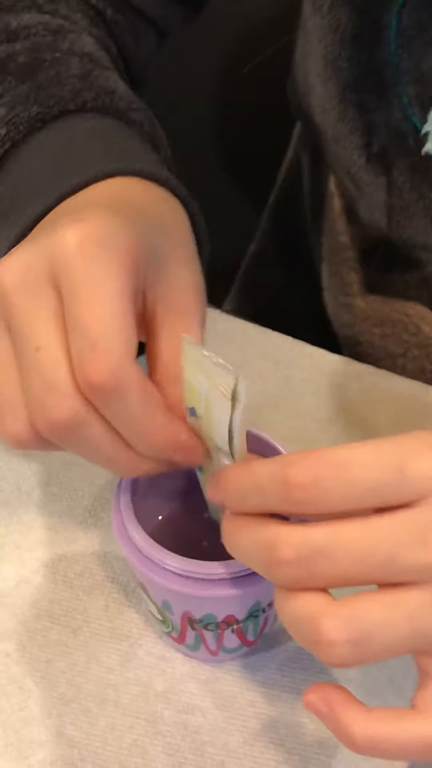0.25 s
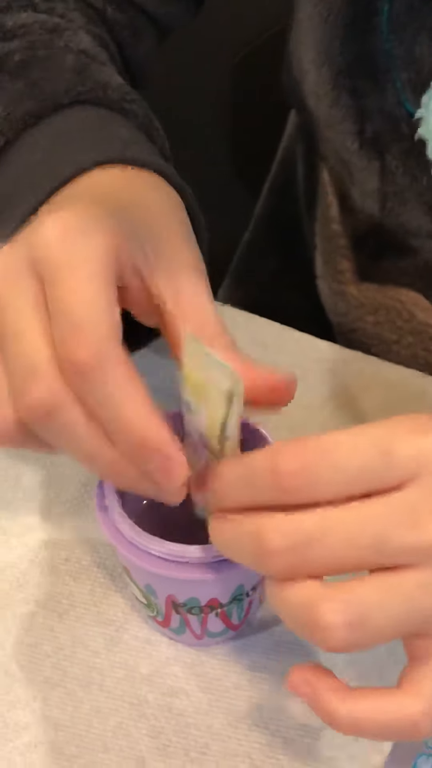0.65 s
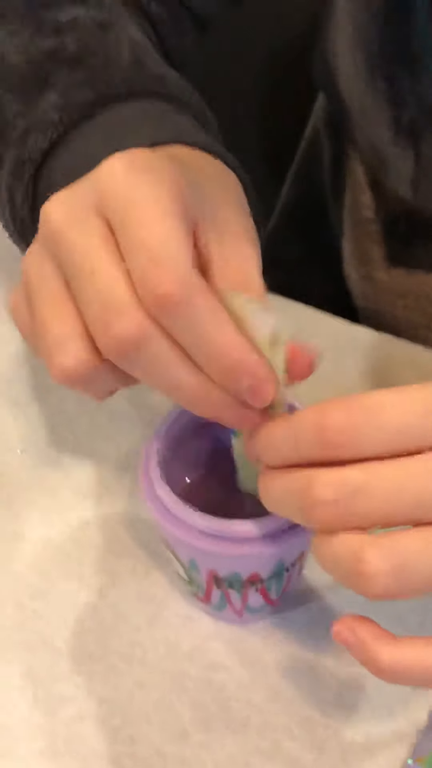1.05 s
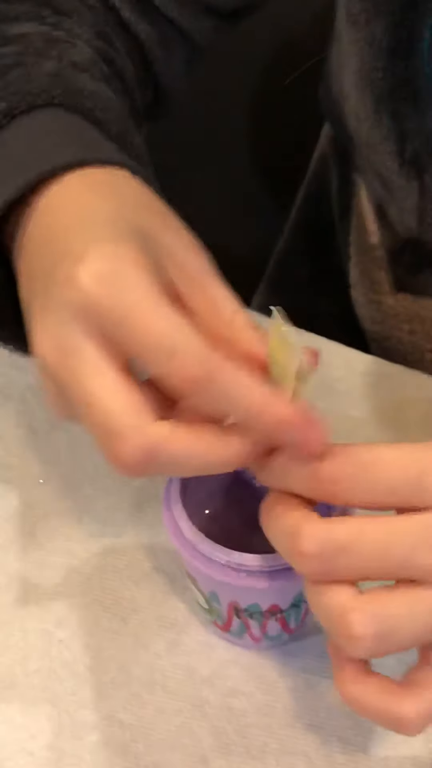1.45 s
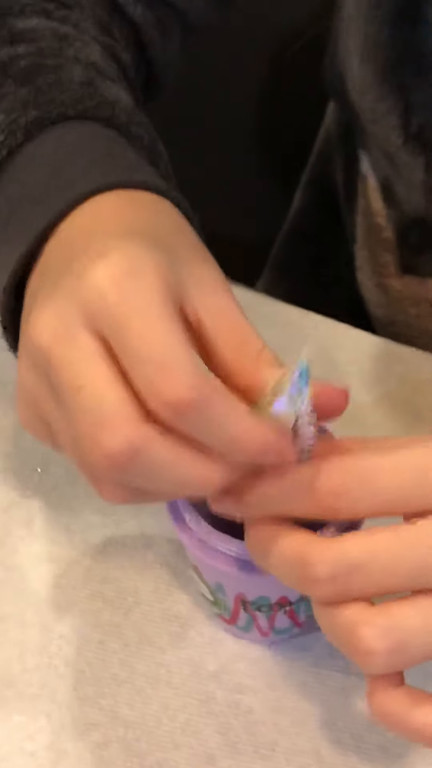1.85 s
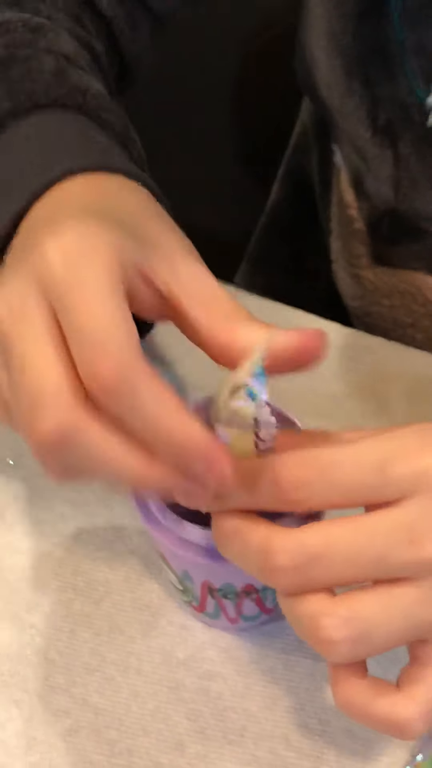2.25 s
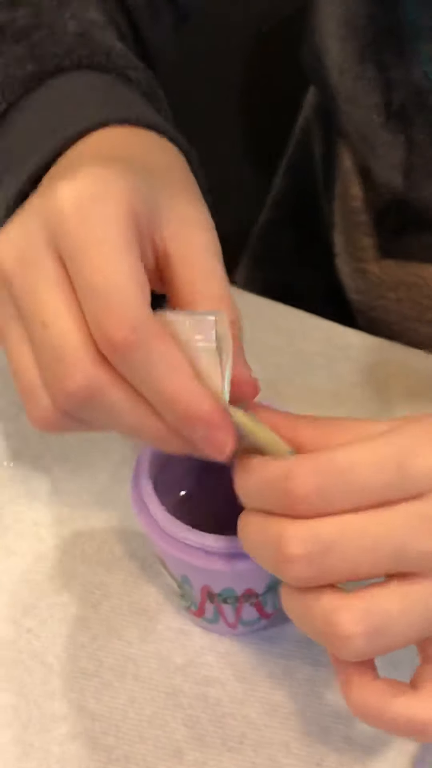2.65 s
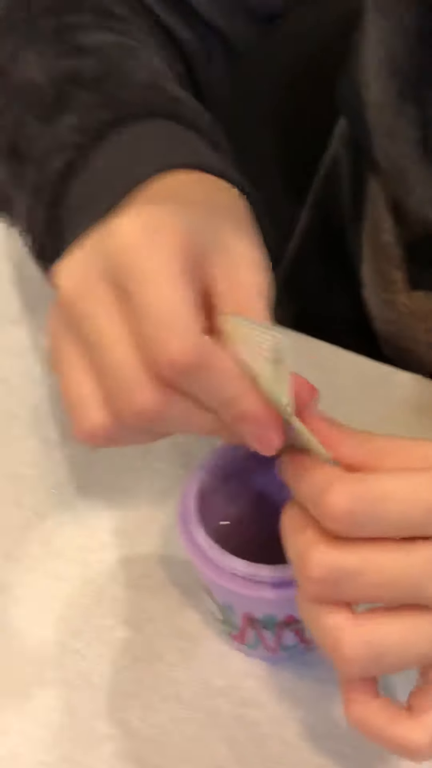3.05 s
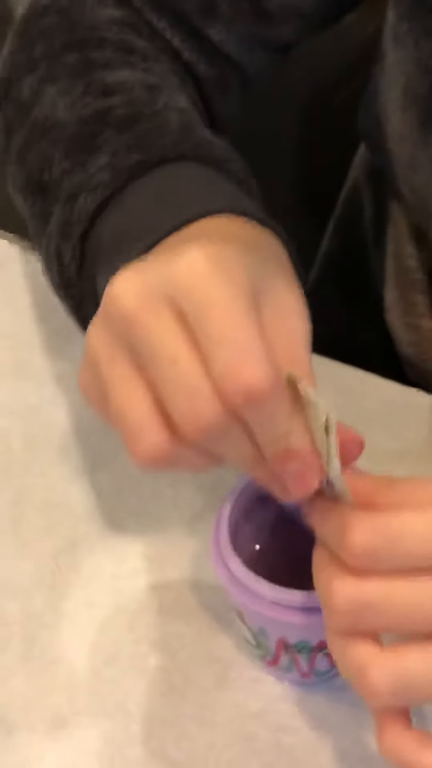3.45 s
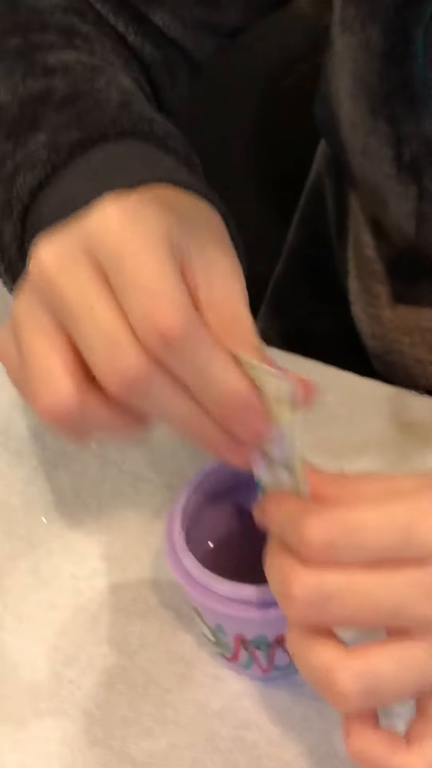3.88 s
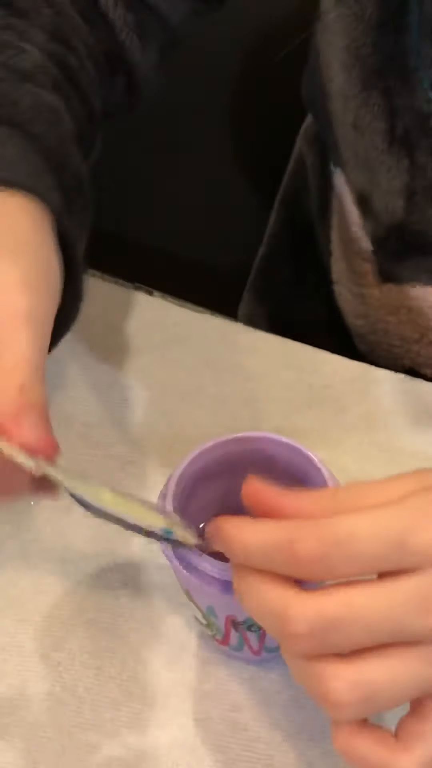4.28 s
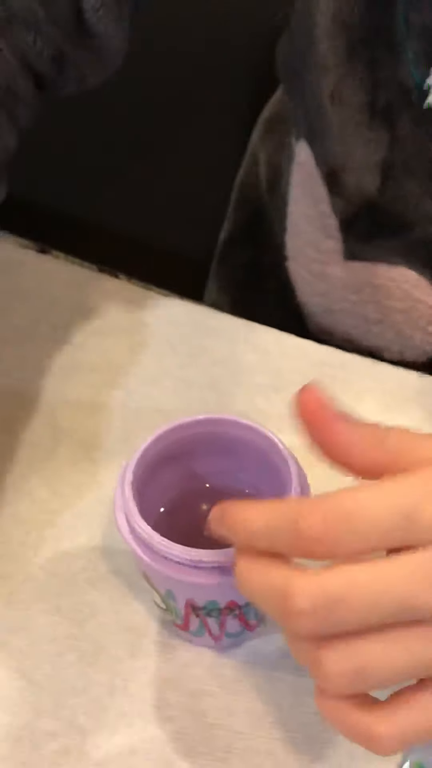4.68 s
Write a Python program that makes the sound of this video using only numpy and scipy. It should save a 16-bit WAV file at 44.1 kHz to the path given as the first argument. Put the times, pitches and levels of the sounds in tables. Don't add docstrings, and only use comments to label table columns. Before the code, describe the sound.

Close, dry crackling of a small foil sachet handled over a plastic cup, in a small quiet room. At 0 s the faint tail of an earlier snap dies away while light ticks begin. Modest crinkles come every tenth of a second or so to 0.6 s, then brighter, stronger snaps at about 0.7, 1.05 and 1.27 s. From 1.6 to 2.4 s single pops are spaced about a third of a second apart, with thin rustling. A strong snap at 2.7 s leads a crisp pair at 2.8 s. After small ticks, more snaps follow at 3.3 and 3.4 s, then a softer quick cluster from 3.6 to 4.15 s. Scratchy slips fade until one last dull snap at 4.72 s. Very soft low table pushes fall near 1.8, 2.7 and 3.5 s. Faint air noise and distant refrigerator hum continue throughout.

```python
import sys
import numpy as np
from scipy import signal
from scipy.fft import rfft, irfft, next_fast_len
from scipy.io import wavfile
from scipy.ndimage import uniform_filter1d, map_coordinates

SR = 44100
rng = np.random.default_rng(int(sys.argv[2]) if len(sys.argv) > 2 else 0)


def digitize_waveform(pressure):
    field = np.atleast_2d(pressure).T
    bounded = np.clip(field, -1, 1)
    quanta = np.round(bounded * 32767).astype(np.int16)
    wavfile.write(sys.argv[1], SR, quanta)


def field_ratio(decibels):
    return 10 ** (np.asarray(decibels, dtype=float) / 20)


N = 212383

# start_s, level_db, pitch_hz (of the panel), brightness_db
SNAPS = [(0.0464, -37, 1850, -7.5), (0.1658, -32.5, 3160, -0.5), (0.2965, -35.5, 1720, -9.5),
         (0.4266, -30.5, 5300, 3), (0.5526, -34.5, 1740, -6), (0.7099, -25.5, 3090, 7.5),
         (0.7208, -32, 1740, 3), (0.858, -29, 1770, -0.5), (1.0373, -25.5, 3130, 6.5),
         (1.055, -30.5, 2780, 0), (1.0607, -31, 5470, -17), (1.2662, -26, 6050, 2.5),
         (1.6062, -29, 2650, -7.5), (1.9485, -30.5, 2820, 0.6), (2.3018, -31, 1870, 0.5),
         (2.6647, -34, 1710, -21), (2.6976, -23.5, 2730, -7.5), (2.7991, -29, 2490, 7.5),
         (2.8223, -35.5, 6240, 2.5), (3.297, -33.5, 3940, -8), (3.4068, -28, 1734, -1.5),
         (3.6154, -42, 3980, -1), (3.621, -37.5, 2640, 8), (3.6566, -31.5, 2870, -3.5),
         (3.7097, -34, 1680, 2.7), (3.871, -32, 5360, 1), (3.8924, -35.5, 2740, -31),
         (3.9774, -35, 1650, 0.5), (4.1502, -35, 5900, 5.5), (4.718, -31.5, 3300, -13)]
# centre_hz, width_hz, level_db
SACHET = [(1664, 340, 5.5), (2650, 450, 2), (3460, 740, -2.5), (4700, 275, 3.5), (5300, 680, 3),
          (7880, 460, -0.5), (9600, 680, -15), (14900, 1400, 0), (14600, 1400, 1.5)]


def unit(x):
    return x / np.sqrt(np.mean(np.abs(x) ** 2, axis=-1, keepdims=True) + 1e-20)


def along(points, hz):
    f, v = np.transpose(points)
    return np.interp(np.log(hz + 1), np.log(f + 1), v)


def mode(f, hz, width_hz):
    return 1j * f * width_hz / (hz * hz - f * f + 1j * f * width_hz)


def body(f, modes):
    top_q = 8
    total = 0
    for k, (hz, width_hz, db) in enumerate(modes):
        total = total + (-1) ** k * field_ratio(db) * mode(f, hz, max(width_hz, hz / top_q))
    return total


def filtered(x, response):
    m = next_fast_len(x.shape[-1] + 4096)
    spectrum = rfft(x, m) * response(np.fft.rfftfreq(m, 1 / SR))
    return irfft(spectrum, m)[..., :x.shape[-1]]


def background():
    # centre_hz, level_db (per Hz)
    air_colour = [(15, -37), (25, -23), (84, -4.5), (170, -10), (249, -5.5), (317, -8.5), (363, -9),
                  (531, -13.5), (863, -16.5), (1040, -14.5), (1700, -22), (14800, -34.5), (16000, -23)]
    # centre_hz, width_hz, level_db (rms)
    orders = [(56.9, 1.04, -70.5), (116.2, 16, -72), (181.4, 0.9, -79.5), (227, 8.2, -77)]
    air = field_ratio(-66) * unit(filtered(rng.standard_normal(N), lambda f: field_ratio(along(air_colour, f))))
    hum = 0
    for hz, width_hz, db in orders:
        hum = hum + field_ratio(db) * unit(filtered(rng.standard_normal(N), lambda f: mode(f, hz, width_hz)))
    return air + hum


def leftover():
    level_db, t60_s = -59, 0.44
    wash = unit(filtered(rng.standard_normal(N), lambda f: body(f, SACHET) * mode(f, 3500, 3700) ** 2))
    return field_ratio(level_db - 60 * np.arange(N) / SR / t60_s) * wash


def bumps():
    # peak_s, pitch_hz, level_db
    pushes = [
        (1.81, 60.4, -54),
        (2.742, 69.4, -60),
        (3.534, 131, -55),
    ]
    t = np.arange(N) / SR
    total = 0
    for s, hz, db in pushes:
        swell = field_ratio(db - 11 * ((t - s) / 0.014) ** 2)
        total = total + swell * np.sin(2 * np.pi * hz * (t - s))
    return total


def patchy(x, patchy_db):
    z = signal.stft(x, nperseg=256)[2]
    field = uniform_filter1d(rng.standard_normal(z.shape), size=5, axis=0)
    field = uniform_filter1d(field, size=9, axis=1)
    return signal.istft(z * field_ratio(patchy_db * field / field.std()), nperseg=256)[1][:len(x)]


def rustle():
    # time_s, level_db
    sliding = [(0.0, -45), (0.3, -77), (0.7, -74), (0.95, -66), (1.23, -64), (1.76, -57), (2.12, -64.5),
               (2.51, -57.5), (2.76, -57), (2.9, -65), (3.3, -67.5), (4.21, -56), (4.46, -62.5),
               (4.82, -90)]
    # peak_s, level_db, fall_ms (for 9 dB)
    finger_slips = [(0.164, -53, 11.5), (0.29, -64, 36), (0.42, -62, 23), (0.551, -59, 36),
                    (0.745, -60, 52), (0.862, -60.5, 30), (1.042, -49, 16.5), (1.159, -60, 34),
                    (1.269, -45, 15.5), (1.443, -51, 10.5), (1.519, -59, 5), (1.682, -62, 5),
                    (1.947, -49, 10.5), (2.28, -57.5, 9), (2.305, -36.5, 6.5), (2.424, -67, 72),
                    (2.451, -42, 2), (2.72, -71, 38), (2.84, -59.5, 44), (2.999, -51.5, 14.5),
                    (3.121, -63, 43), (3.303, -41.5, 10.5), (3.404, -61.5, 48), (3.62, -40.5, 6.5),
                    (3.662, -65, 49), (3.705, -61, 24), (3.872, -40, 6.5), (4.134, -55.5, 13),
                    (4.227, -59, 50), (4.31, -44.5, 5.5), (4.443, -56, 1.5)]
    grit_db, clump_db = 6, 4.5
    rise_over_fall = 0.62
    t = np.arange(N) / SR
    level = field_ratio(np.interp(t, *np.transpose(sliding)) - 16)
    flares = [(s, db - 18 + 0.58 * bright_db, 0.95, 4.2) for s, db, hz, bright_db in SNAPS]
    flares += [(s, db, rise_over_fall * ms, ms) for s, db, ms in finger_slips]
    for s, db, rise_ms, fall_ms in flares:
        near = slice(max(round((s - .2) * SR), 0), round((s + .2) * SR))
        ms = 1000 * (t[near] - s)
        level[near] += field_ratio(db - 9 * np.where(ms < 0, -ms / rise_ms, ms / fall_ms))
    clumps = map_coordinates(rng.standard_normal(N // 60 + 4), [np.arange(N) / 60])
    slips = rng.standard_normal(N) * field_ratio(grit_db * rng.standard_normal(N) + clump_db * clumps)

    def foil_response(f):
        return (body(f, SACHET) + 1.7 + 2.2 * mode(f, 3220, 1800)) * mode(f, 3950, 22000) ** 2

    return level * unit(filtered(patchy(slips, patchy_db=2.5), foil_response))


def creases():
    # start_s, level_db, pitch_hz, brightness_db
    small_folds = [(0.0178, -48.5, 3200, -17), (0.1596, -38.5, 5700, 0), (0.1721, -42, 3400, -3),
                   (0.2875, -43, 3400, -15), (0.4144, -34.5, 3020, -40), (0.7325, -35, 2720, -1),
                   (1.0324, -39.5, 2210, 3), (1.0443, -39.5, 1700, 11), (1.1336, -43.5, 5300, -5),
                   (1.1601, -46.5, 2200, 2), (1.1833, -42, 2120, -4), (1.2567, -37, 1880, -35),
                   (1.2722, -36.5, 5250, -30), (1.2868, -41, 1810, 6), (1.4282, -40.5, 1770, -10),
                   (1.5575, -41, 1810, -7), (2.1182, -44.5, 1600, -69), (2.4473, -41.5, 1800, 10),
                   (2.4738, -38.5, 1710, -54), (2.6577, -43, 2760, -3), (3.0011, -41.5, 2550, 7),
                   (3.021, -37.5, 3780, 1), (3.304, -37.5, 4640, 5), (3.311, -38, 5270, -11),
                   (3.6062, -43, 3930, 0), (3.7018, -46, 2650, 2), (3.9703, -36.5, 5300, -11),
                   (4.2279, -43, 4440, -18), (4.2464, -44, 2730, -9), (4.7561, -40.5, 3370, -11)]
    # start_s, level_db, pitch_hz, brightness_db
    faint_ticks = [(0.051, -46, 1740, -22), (0.064, -60, 5500, 9.5), (0.1772, -47.5, 2380, -22),
                   (0.2787, -48, 5300, 2), (0.5452, -47, 1700, -25), (0.8392, -53, 1820, -10),
                   (1.2512, -56, 2020, -30), (1.3939, -57, 1850, -5), (1.4766, -51.5, 1900, -19),
                   (1.6273, -47, 1880, -33), (1.9023, -59, 1830, 6), (1.9303, -54, 1640, 2),
                   (1.1463, -56, 2080, 6), (2.4653, -44, 2440, -5), (2.4988, -48, 1760, 0),
                   (2.6887, -54, 2650, 9), (2.7291, -48, 2940, -17), (3.0825, -50.5, 3700, 2),
                   (3.116, -53, 1720, 4), (3.2186, -58.5, 3900, 14.5), (3.2332, -58, 3920, 8),
                   (3.3988, -52, 6740, -5), (3.5844, -47, 3700, -55), (3.6947, -43, 3460, -17),
                   (3.8426, -51, 3770, -7), (4.1134, -52.5, 4030, 3), (4.1799, -48, 2720, 4),
                   (4.3885, -51.5, 5570, 2), (4.441, -68, 4400, 13.5), (4.5894, -58, 2400, -33)]
    snap_ms, fold_ms, tick_ms = 0.75, 1.24, 2.8
    main = np.repeat(SNAPS, 4, axis=0)
    luck = rng.random((len(main), 3))
    late_s = -np.log(1 - luck[:, 0]) * 0.038 + .004
    after_s = np.minimum(main[:, 0] + late_s, N / SR)
    after_db = main[:, 1] - 32.5 - 61 * late_s + 8 * (luck[:, 1] - .5)
    after_hz = main[:, 2] * 2 ** (luck[:, 2] - .5)
    after = np.transpose([after_s, after_db, after_hz, 7 + main[:, -1] / 2])
    kinds = [(SNAPS, snap_ms), (small_folds, fold_ms), (faint_ticks, tick_ms), (after, tick_ms)]
    rows = np.vstack([np.insert(np.asarray(table, float), 4, ms, axis=1) for table, ms in kinds])
    scatter_db = -0.5 * rng.standard_normal(len(rows))
    shorter_db = 0.58 * np.clip(rows[:, 1] + 32, 0, None)
    rows[:, -1] *= field_ratio(scatter_db - shorter_db)
    return rows


def snaps(rows, panel_db, even=False):
    # centre_hz, width_hz, level_db
    cup_air = [(680, 583, 5), (1057, 460, 7)]
    # time_s, thud_change_db
    landings = [(0.1721, 8.5), (0.2966, -0.5), (0.4264, 10), (1.0443, -5), (1.2567, -26), (1.2661, -8),
                (2.7989, -1), (2.8225, 13.5), (3.304, 6.5), (1.9492, 5), (3.4069, 7), (3.621, 3),
                (3.6562, -2.5), (4.2279, 11), (4.2464, 9), (4.5894, 7)]
    grain, panel_q = 512, 3.2
    s, db, hz, bright_db, ms = rows.T[:, :, None]

    thud_db = -7.5 - 0.33 * np.clip(db + 45.5, -9, None) - 6 * np.log2(hz / 1750)
    thud_db = thud_db + sum(change_db * (np.abs(s - when) < .0025) for when, change_db in landings)

    if even:
        push = np.zeros((len(s), grain))
        push[:, 0] = 1
    else:
        u = np.arange(grain) / SR / (np.clip(ms, .3, 7) / 1000)
        jerks = rng.standard_normal((len(s), grain)) * field_ratio(4.77 * rng.standard_normal((len(s), grain)))
        push = jerks * (1 - np.exp(-u / 0.19)) * np.exp(-(u / 0.97) ** 0.86)

    panel = unit(filtered(push, lambda f: mode(f, hz, hz / panel_q) ** 2))
    soft_hz = 8500 * field_ratio(0.08 * bright_db)
    blunt = filtered(push, lambda f: mode(f, 0.5 * soft_hz, soft_hz) ** 2)

    def pouch_response(f):
        lean = 0.6 + mode(f, hz, 1.5 * hz)
        return (body(f, SACHET) + 0.04) * mode(f, 2510, 10400) ** 3 * lean

    pouch = unit(filtered(blunt, pouch_response))
    crisp = unit(filtered(push, lambda f: (body(f, SACHET) + 0.19) * mode(f, 12000, 18500) ** 3))
    thud = unit(filtered(push, lambda f: body(f, cup_air) * mode(f, 550, 2100)))

    panel_gain = field_ratio(panel_db - 4 * np.clip(np.log2(hz / 3300), 0, None))
    ring = unit(panel_gain * panel + 0.77 * pouch)
    shape = ring + field_ratio(bright_db - 4.5) * crisp + field_ratio(thud_db) * thud
    size = field_ratio(db - 9.5) * np.clip(ms, 1, 7) ** 0.089
    at = np.round((s - .0004) * SR).astype(int) + np.arange(grain)
    return np.bincount(at.ravel(), (size * shape).ravel(), N + grain)[:N]


def room(x):
    # centre_hz, t60_s
    decay = [(500, 0.25), (1800, 0.38), (4000, 0.48), (8000, 0.5), (15000, 0.25)]
    # centre_hz, level_db
    wall_colour = [(400, 6.5), (1800, 0), (3500, -4), (7000, -10), (15000, -10)]
    # centre_hz, width_hz, level_db
    hollows = [(1850, 105, 1), (2950, 900, -1.5)]
    out, step = np.zeros(N + SR), SR // 10
    for start in range(0, N, step):
        hz, t, z = signal.stft(rng.standard_normal(SR // 2), SR, nperseg=128)
        fade = field_ratio(-60 * t / along(decay, hz)[:, None] + along(wall_colour, hz)[:, None])
        early = 1 + 11.2 * field_ratio(-60 * t / 0.03)
        tail = signal.istft(z * fade * early, SR, nperseg=128)[1]
        age_s = np.arange(len(tail)) / SR
        tail *= np.where(age_s < .009, field_ratio(-9), 1) * (age_s > .0015)
        wet = signal.fftconvolve(x[start:start + step], tail / np.linalg.norm(tail))
        out[start:][:len(wet)] += wet[:len(out) - start]
    return filtered(out[:N], lambda f: 1 + sum(field_ratio(db) * mode(f, hz, w) for hz, w, db in hollows))


def scene():
    rows, slips = creases(), rustle()
    front = snaps(rows, panel_db=0.5)
    around = snaps(rows, panel_db=-1.5, even=True)
    walls = field_ratio(-15.5) * room(around + slips)
    return (front + slips + walls + leftover() + bumps() + background())[None]


def top_gate(x):
    low = filtered(x, lambda f: 1 / (1 + (f / 15900) ** 220))
    top = filtered(x - low, lambda f: 1 / (1 + (f / 16400) ** 60))
    power = np.abs(uniform_filter1d(top ** 2, size=128))
    return low + top * power / (power + field_ratio(-58) ** 2)


def low_pass(x):
    return signal.sosfilt(signal.butter(12, 17000, fs=SR, output="sos"), x)


def record(dry):
    mix = top_gate(dry)
    return low_pass(mix)


dry = scene()
out = record(dry)
digitize_waveform(out)
```